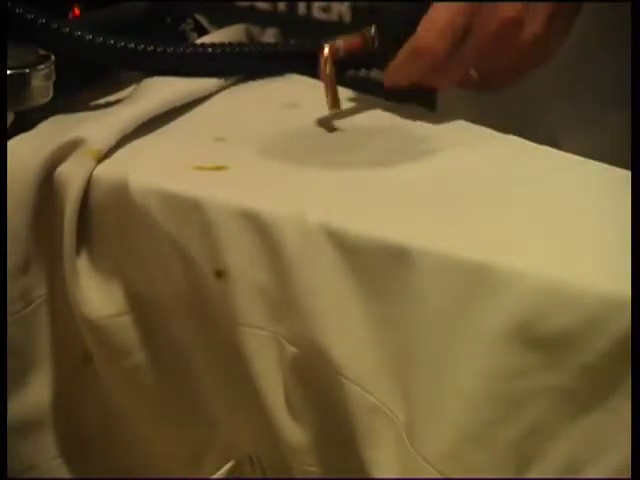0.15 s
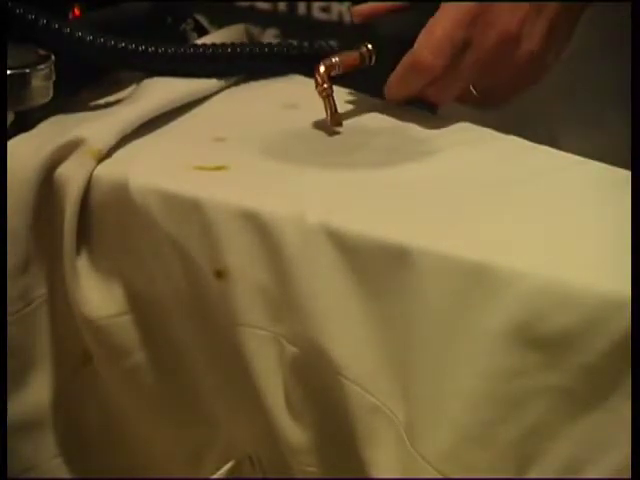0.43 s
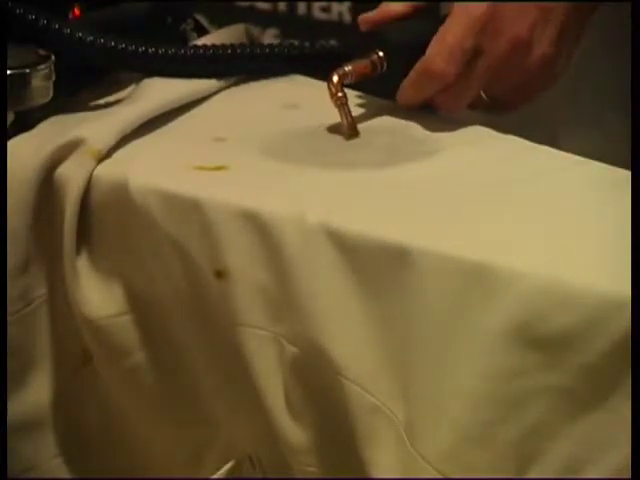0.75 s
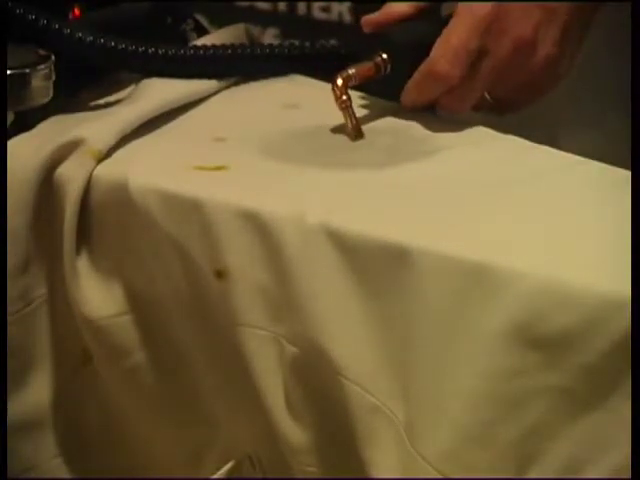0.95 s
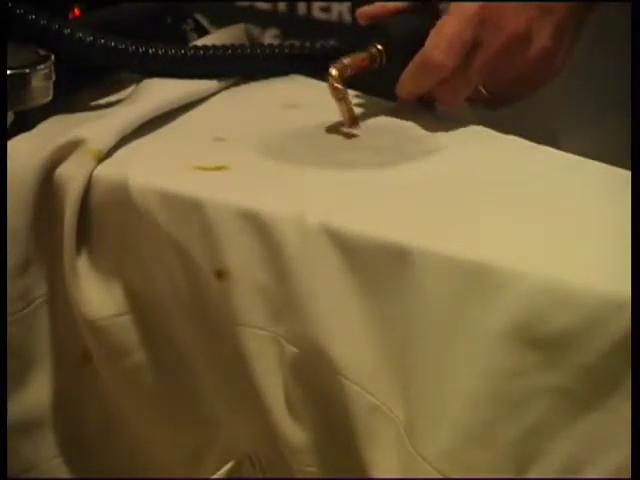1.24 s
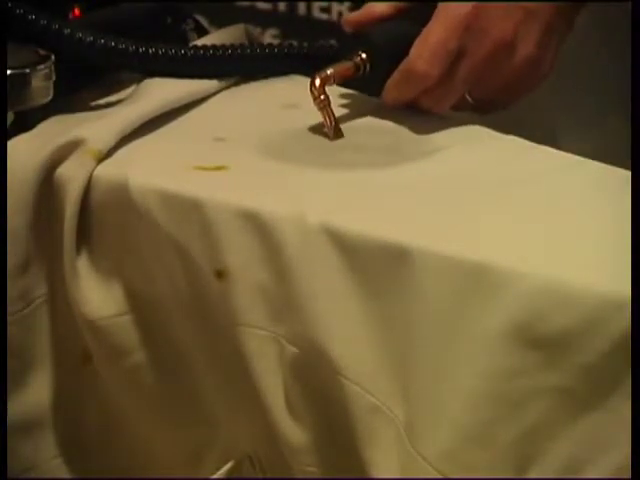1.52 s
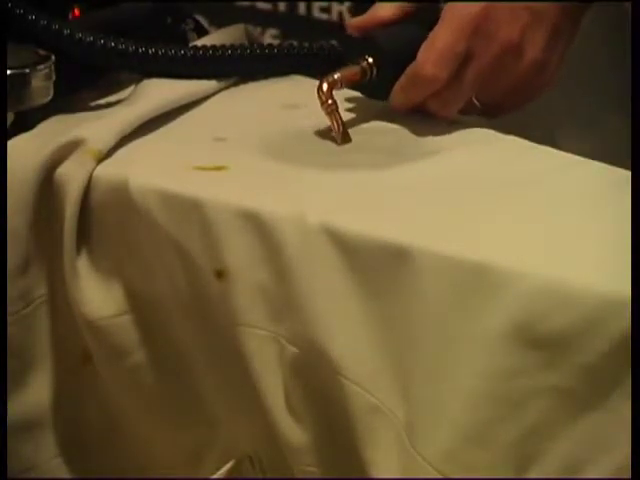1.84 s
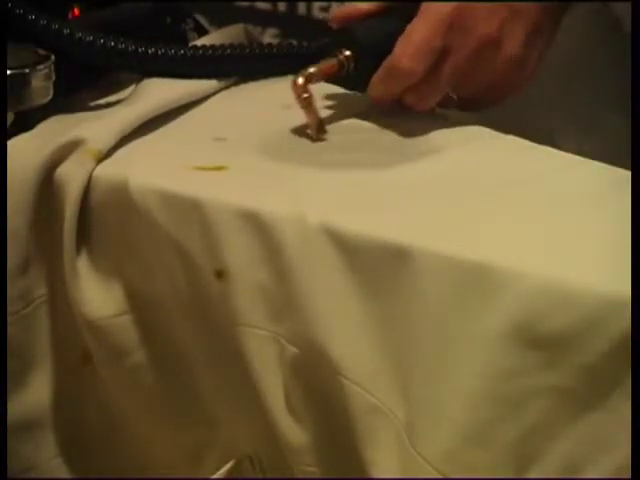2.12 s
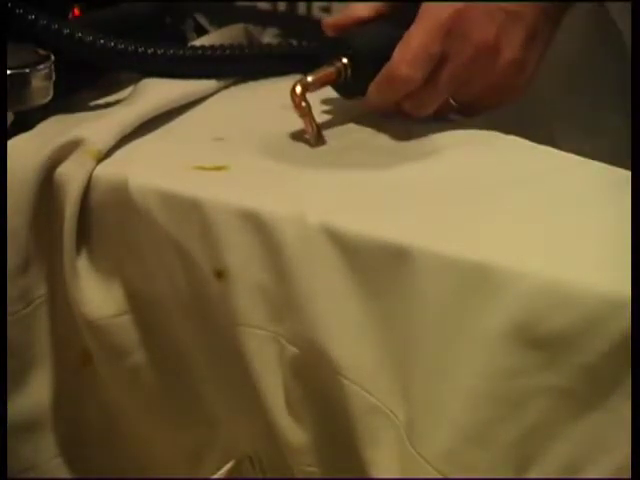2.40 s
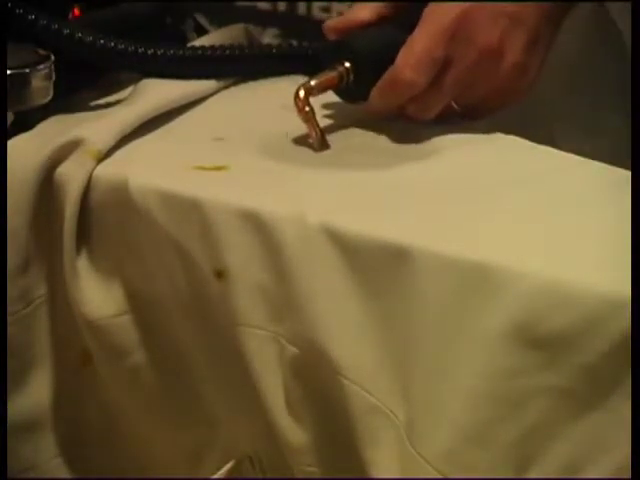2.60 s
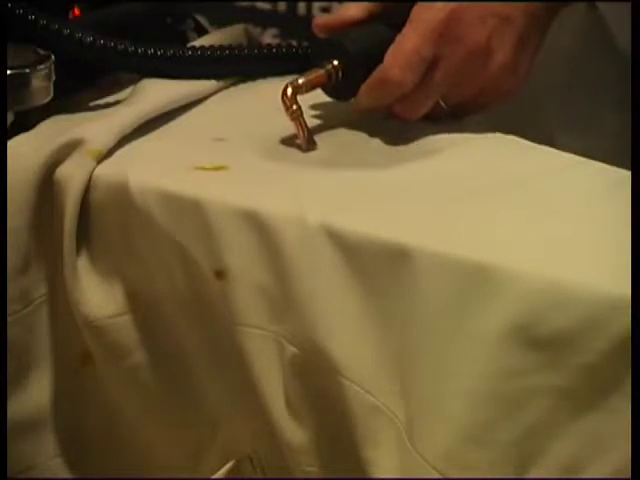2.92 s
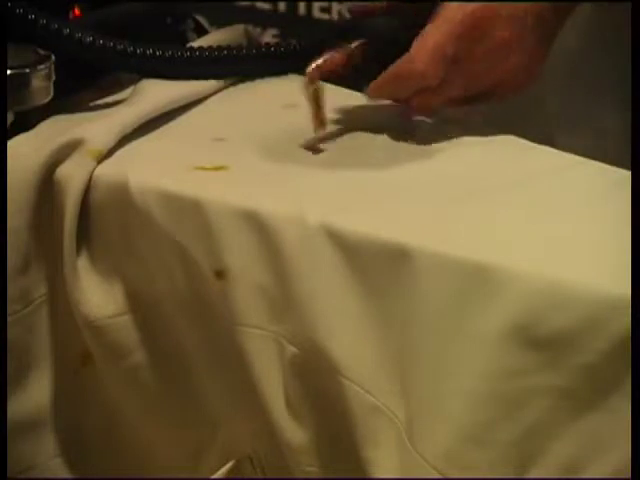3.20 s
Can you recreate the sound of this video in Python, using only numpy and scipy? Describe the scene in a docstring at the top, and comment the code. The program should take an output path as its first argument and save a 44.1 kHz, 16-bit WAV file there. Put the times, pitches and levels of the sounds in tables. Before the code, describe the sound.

A steam gun hisses from the start, rising over the first 0.4 seconds, thin and very bright with fine spitting droplets and a dull cloth rush. Short wet spurts land near 0.55 and 0.75. The hiss keeps swelling and dipping, briefly weak around 0.57, 1.6, 2.3 and 2.65, strongest near 2.0, growing fuller until 3.35. Low mains hum, faint ticking buzz, high whine and room noise continue underneath.

```python
"""In a faintly noisy room, a steam gun hisses close over a garment.
The hiss is filtered noise that swells and eases as the nozzle moves on the cloth; it rings in two broad
resonances and spits fine droplets, and the cloth adds a duller rush. A few short spurts of spray are noise bursts.
Underneath run a mains hum made of sines, a ticking buzz of pulses and a thin electrical whine of steady tones."""
import sys
import numpy as np
from scipy import signal
from scipy.fft import rfft, irfft, next_fast_len
from scipy.io import wavfile
from scipy.ndimage import uniform_filter1d

SR = 44100
rng = np.random.default_rng(int(sys.argv[2]) if len(sys.argv) > 2 else 0)


def master(y):
    """Save y as 16-bit WAV."""
    cut = np.clip(np.atleast_2d(y).T, -1, 1)
    pcm = np.round(cut * 32767)  # scale
    wavfile.write(sys.argv[1], SR, pcm.astype(np.int16))


N = 147735  # length in samples
TIME_S = np.arange(N) / SR
TOP_HZ = 15740  # upper edge of the sound


def undb(db):
    """Turn decibels into a plain gain."""
    return 10 ** (np.asarray(db) / 20)


def unit(x):
    """Scale to an average strength (rms) of 1."""
    return x / np.sqrt(np.mean(x ** 2))


def follow(rows):
    """Draw straight lines over time between (time, value) points."""
    at_s, value = np.array(rows).T
    return np.interp(TIME_S, at_s, value)


def level(rows):
    """Gain over time from (time, decibel) points."""
    return undb(follow(rows))


def walk(rate):
    """Smooth random wandering, with this many new random values a second and a spread near 1."""
    hold = max(int(SR / rate), 2)
    steps = np.repeat(rng.standard_normal(N // hold + 1), hold)
    smooth = uniform_filter1d(uniform_filter1d(steps, hold), hold)
    return 0.96 * smooth[:N]


def shape(x, gain):
    """Filter a sound by a gain that depends on frequency."""
    size = next_fast_len(N)
    hz = np.maximum(np.fft.rfftfreq(size, 1 / SR), 1)
    return irfft(rfft(x, size) * gain(hz), size)[..., :N]


def colour(x, points):
    """Filter a sound through a curve of (frequency, decibel) points, then scale it to rms 1."""
    at_hz, db = np.array(points).T
    return unit(shape(x, lambda hz: undb(np.interp(np.log(hz), np.log(at_hz), db))))


def white_noise():
    """Plain random noise, equally strong at all pitches."""
    return rng.standard_normal(N)


WANDER_DB, FLICKER_DB = 0.6, 1.46  # spread of the slow and the quick level changes


def turbulence(count=16):
    """Rough gas flow: noise whose bands wander slowly and flicker quickly, each on its own."""
    noise = white_noise()
    total = 0
    step_hz = TOP_HZ / count
    for k in range(count + 2):
        # triangular bands that overlap their neighbours
        band = shape(noise, lambda hz: np.maximum(1 - abs(hz / step_hz - k), 0))
        change_db = WANDER_DB * walk(5.92) + FLICKER_DB * walk(35.09)
        total = total + band * undb(change_db)
    return unit(total)


SPIT_PER_S, SPIT_SPREAD_DB = 260, 5.5
SPIT_DB = -18.5  # level beside the noise it joins, before colouring


def droplets():
    """Tiny clicks of condensed water in the jet, a few much stronger than the rest."""
    happens = rng.random(N) < SPIT_PER_S / SR
    size = np.minimum(rng.exponential(size=N), 4)
    sign = rng.choice([-1, 1], N)
    return undb(SPIT_DB) * unit(happens * sign * undb(SPIT_SPREAD_DB * size))


# Strength of the jet before its trim: start_s, level_db
JET_LEVEL = [(0,-43.5),(.08,-42),(.18,-38.3),(.24,-36.5),(.31,-39.3),(.4,-35),(.51,-39.5),(.55,-35.5),(.57,-47),(.62,-41),(.7,-34.5),(.87,-36),(.9,-37.5),(.98,-39),(1.03,-36),(1.12,-35.5),(1.3,-38.5),(1.38,-34.5),(1.53,-39),(1.58,-44),(1.68,-38.5),(1.82,-40.5),(1.89,-36),(1.99,-32.5),(2.07,-35.5),(2.25,-35.5),(2.31,-43.5),(2.41,-38.5),(2.6,-39.5),(2.66,-44),(2.79,-39),(2.93,-36.5),(2.97,-41.5),(3.08,-41),(3.12,-36.8),(3.27,-41),(3.35,-39)]
# How far the jet has turned from hollow to full colour: start_s, share (0 to 1)
JET_FULLNESS = [(0,0.5),(.5,.03),(.75,0.04),(1.5,0.5),(1.95,.4),(2.2,0.65),(2.45,0.74),(2.8,0.8),(3.35,1)]
# Relative spectra of the jet, hollow and full: pitch_hz, level_db (per Hz)
HOLLOW_SPECTRUM = [(3000,-39),(6300,-13.5),(7200,-14.5),(8100,-9.5),(8900,-13.5),(10500,-5.5),(11500,-11.5),(12550,-7.5),(13300,1.5),(14200,-0.5),(14700,-5.5),(15800,0.5)]
FULL_SPECTRUM = [(3000,-26),(6300,-17),(7700,-8),(9100,-8),(10500,-7.5),(11400,-5.5),(12000,-3),(12700,-2.5),(13400,-1),(14500,-3.5),(15800,-2)]
JET_TRIM_DB = 1.17


def jet(spit):
    """Bright hiss of steam and droplets, blended over time between a hollow and a full colour."""
    flow = turbulence() + spit
    full = np.clip(follow(JET_FULLNESS), 0, 1)
    hollow_part = (1 - full) * colour(flow, HOLLOW_SPECTRUM)
    full_part = full * colour(flow, FULL_SPECTRUM)
    return (hollow_part + full_part) * level(JET_LEVEL) * undb(JET_TRIM_DB)


# Level of the lower hiss before its trim: start_s, level_db
RUSH_LEVEL = [(0,-50.5),(.12,-46.5),(.2,-49),(.55,-48),(.58,-50.5),(.75,-49.5),(.95,-50.5),(1.1,-48),(1.48,-48),(1.58,-51.5),(1.68,-50.5),(1.83,-50.5),(1.96,-46),(2.1,-49),(2.26,-47.5),(2.31,-52),(2.43,-50),(2.58,-49.5),(2.67,-51),(2.76,-47),(2.92,-49),(3.0,-50),(3.09,-50),(3.13,-46),(3.35,-49)]
# Relative spectrum of the lower hiss: pitch_hz, level_db
RUSH_SPECTRUM = [(1500,-15),(2400,-8.5),(3100,-4.5),(3800,0.5),(4300,-1.5),(4900,1),(6000,-3.5),(7200,2),(9000,-7),(15000,-10.5)]
RUSH_TRIM_DB = 0.4


def lower_hiss(spit):
    """Rush of turbulence and droplets, lower in pitch than the bright jet."""
    return colour(turbulence() + spit, RUSH_SPECTRUM) * level(RUSH_LEVEL) * undb(RUSH_TRIM_DB)


def resonance(hz, width_hz):
    """Turbulence ringing in one broad resonance."""
    return unit(shape(turbulence(), lambda f: 1 / (1 + (2 * (f - hz) / width_hz) ** 2)))


# Level of the upper resonance before its trim: start_s, level_db
RING_LEVEL = [(0,-51),(.2,-44.5),(.24,-38),(.27,-43),(.55,-43),(.57,-51),(.72,-45),(.87,-45.5),(.95,-49),(1.03,-48),(1.18,-40.5),(1.3,-45),(1.44,-44.5),(1.59,-55),(1.69,-48),(1.79,-55),(1.92,-47),(2.23,-52),(2.3,-65),(2.5,-56),(2.68,-47),(2.9,-45),(2.98,-58),(3.1,-52),(3.13,-41.5),(3.26,-53),(3.35,-53)]
# Level of the lower resonance: start_s, level_db
LOW_RING_LEVEL = [(0,-75),(.12,-64),(.19,-47.5),(.3,-52),(.55,-49.5),(.58,-65),(.75,-57.5),(1.2,-53),(1.45,-56),(1.6,-59),(3.35,-73)]
RING_HZ, RING_WIDTH_HZ, RING_TRIM_DB = 10480, 1500, -1.5
LOW_RING_HZ, LOW_RING_WIDTH_HZ = 5320, 1830


def jet_rings():
    """The two broad resonances of the jet, each swelling on its own."""
    upper = resonance(RING_HZ, RING_WIDTH_HZ) * level(RING_LEVEL) * undb(RING_TRIM_DB)
    lower = resonance(LOW_RING_HZ, LOW_RING_WIDTH_HZ) * level(LOW_RING_LEVEL)
    return upper + lower


# Level of the low rush in the cloth: start_s, level_db
CLOTH_LEVEL = [(0,-58.5),(.36,-56),(.5,-51.5),(.59,-62),(.75,-53),(.9,-59),(1.1,-55),(1.4,-56.5),(1.58,-65),(2.0,-58),(2.4,-62),(2.75,-59),(3.35,-59)]
# Relative spectrum of the cloth rush: pitch_hz, level_db
CLOTH_SPECTRUM = [(100,-15),(400,2),(900,1),(1300,1),(1750,2.5),(2200,-5.5),(3200,-9.5),(6000,-12)]


def cloth_rush(spit):
    """Low rush in the cloth: dull noise with the droplets in it."""
    return colour(white_noise() + spit, CLOTH_SPECTRUM) * level(CLOTH_LEVEL)


FLUTTER_DB = 0.53  # spread of the shared level change


def steam():
    """All parts of the hiss fluttering together; jet, lower hiss and cloth rush share the same droplets."""
    spit = droplets()
    parts = jet(spit) + lower_hiss(spit) + jet_rings() + cloth_rush(spit)
    return parts * undb(FLUTTER_DB * walk(45.94))


MAINS_HZ = 50
TICK_AT_S = .01575  # time of the first tick
SINCE_TICK_S = TIME_S - TICK_AT_S


def mains_partials(rows, lag_s):
    """Sum of waves at multiples of the mains, all peaking together this long after each tick."""
    total = 0
    for multiple, db in rows:
        angle = 2 * np.pi * round(multiple) * MAINS_HZ * (SINCE_TICK_S - lag_s)
        total = total + np.sqrt(2) * undb(db) * np.cos(angle)  # root 2 makes db an rms level
    return total


# Partials of the hum: mains_multiple, level_db
HUM_PARTIALS = [(1,-47.5),(2,-54.5),(3,-75),(4,-72)]
HUM_LAG_S = 0.008415  # the hum dips to its trough this long after the tick


def hum():
    """Low mains hum, turned upside down so that its partials reach their troughs together."""
    return -mains_partials(HUM_PARTIALS, HUM_LAG_S)


# Overtones of the buzz, before they waver: mains_multiple, level_db
BUZZ_OVERTONES = [(5,-82.5),(6,-74.5),(7,-68),(11,-72.5)]
# Slow wavering of those overtones: start_s, level_db (change)
BUZZ_WAVER = [(0,1),(1.1,0),(1.9,-4.5),(2.4,-2.5),(3.35,1)]
TICK_S, TICK_DB = .0001, -40.5  # bell-curve spread, and peak before filtering
SURGE_S, SURGE_DB = 0.00164, -51  # length, and height before filtering


def buzz():
    """A sharp tick and a short surge of current once in every mains cycle, plus wavering overtones."""
    cycle_s = 1 / MAINS_HZ
    # time from the nearest tick, negative just before it
    near_s = (SINCE_TICK_S + cycle_s / 2) % cycle_s - cycle_s / 2
    tick = undb(TICK_DB) * np.exp(-.5 * (near_s / TICK_S) ** 2)
    start_s = -3 * TICK_S
    surge = undb(SURGE_DB) * ((near_s > start_s) & (near_s < start_s + SURGE_S))
    # keep mainly 180 to 3500 Hz
    pulses = shape(tick + surge, lambda hz: 1 / np.sqrt((1 + (180 / hz) ** 4) * (1 + (hz / 3500) ** 4)))
    overtones = level(BUZZ_WAVER) * mains_partials(BUZZ_OVERTONES, SURGE_S / 4)
    return pulses * undb(.5 * walk(23)) + overtones


# Steady electrical tones: pitch_hz, level_db
STEADY_TONES = [(25,-57.5),(75,-76.5),(125,-73),(175,-75),(8000.5,-75.5),(15575,-74),(15625,-51.5)]


def whine():
    """Steady sines of the electrics: a faint drone from half the mains rate up, and a thin high whine."""
    return sum(np.sqrt(2) * undb(db) * np.sin(2 * np.pi * hz * TIME_S) for hz, db in STEADY_TONES)


# Relative spectrum of the room noise: pitch_hz, level_db
ROOM_SPECTRUM = [(16,16),(40,1),(62,21.5),(90,10),(140,7.5),(200,8),(300,5),(400,0),(600,0.5),(900,5.5),(1250,-2),(1750,3),(2200,-18),(5000,-5),(15000,-0.5)]
ROOM_DB = -52


def room_noise():
    """Faint steady background of coloured noise."""
    return undb(ROOM_DB) * colour(white_noise(), ROOM_SPECTRUM)


# Brief spurts from the nozzle: peak_s, level_db
SPURT_BURSTS = [(.54,-35),(.556,-42),(.748,-41)]
# Relative spectrum of a spurt: pitch_hz, level_db (per Hz)
SPURT_SPECTRUM = [(300,-10),(2400,-7),(4500,-2),(7500,0),(10500,0),(15000,-6)]
SPURT_S = .003  # bell-curve spread of each burst


def spurts():
    """Slugs of condensed water leave the nozzle as short bursts of spray."""
    bursts = sum(undb(db) * np.exp(-.5 * ((TIME_S - at_s) / SPURT_S) ** 2) for at_s, db in SPURT_BURSTS)
    return bursts * colour(white_noise(), SPURT_SPECTRUM)


def scene():
    """Add up all the sounds, the same in both channels."""
    mix = steam() + hum() + buzz() + whine() + room_noise() + spurts()
    return np.tile(mix, (2, 1))


def record(dry):
    """The recorder cuts steeply above the upper edge of the sound."""
    cut = signal.ellip(16, .1, 80, TOP_HZ, fs=SR, output="sos")
    return signal.sosfilt(cut, dry)


dry = scene()
out = record(dry)
master(out)
```